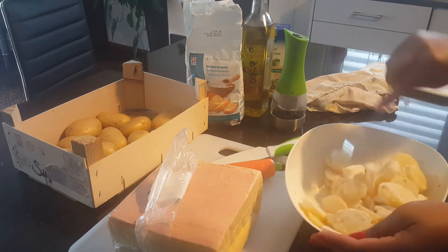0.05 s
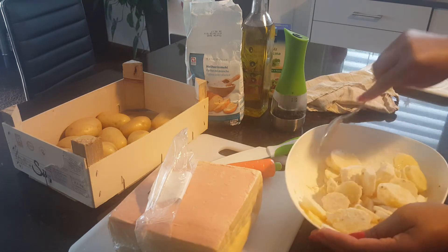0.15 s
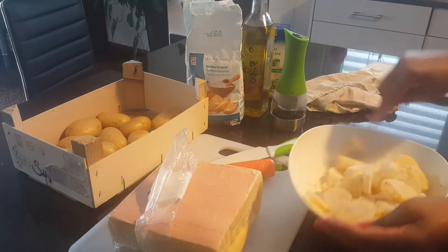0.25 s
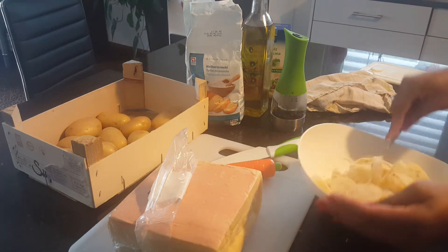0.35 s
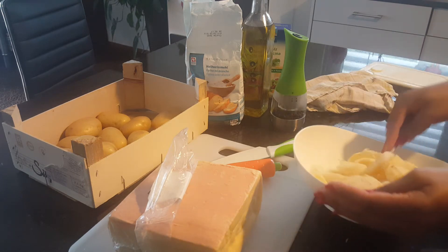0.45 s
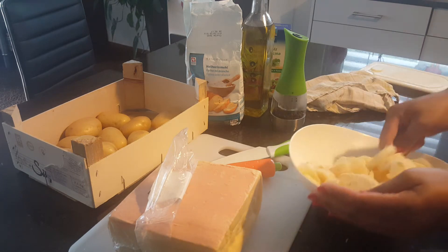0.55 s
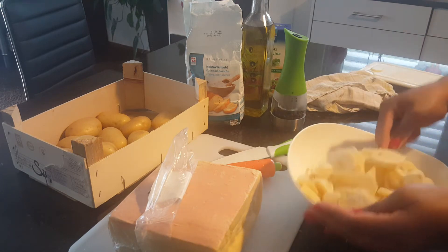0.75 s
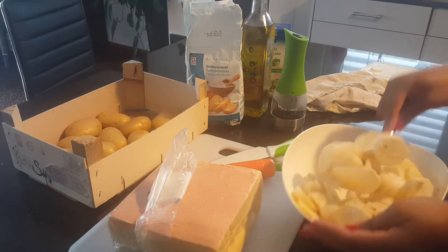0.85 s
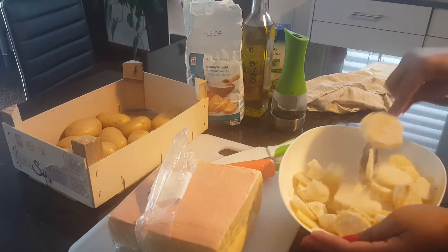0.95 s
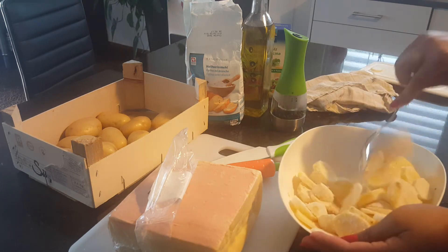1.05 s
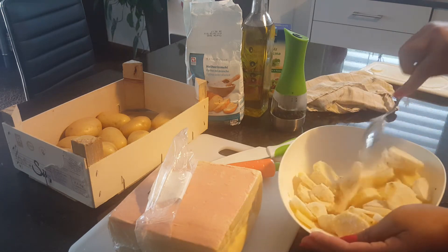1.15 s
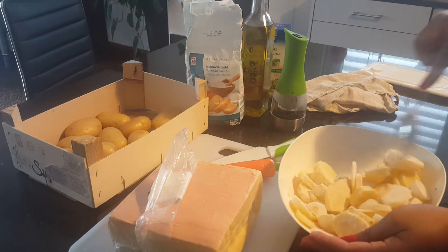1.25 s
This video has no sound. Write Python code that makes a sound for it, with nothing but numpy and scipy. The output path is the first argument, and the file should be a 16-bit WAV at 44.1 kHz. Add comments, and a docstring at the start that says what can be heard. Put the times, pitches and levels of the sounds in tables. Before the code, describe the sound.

A spoon knocks a hand-held bowl of raw potato slices in a small kitchen. Faint wet sliding comes first, then a short, dull clack at 0.23 s with slight ring and room echo. Slices pat and scrape, with a wet fizz and light spoon ticks near 0.35 and 0.6 s. Soft thuds at 0.7 s precede a weaker, duller knock and pats at 1 s. Quiet air and wavering low hum continue.

```python
"""A small kitchen, a hand-held bowl of raw potato slices, heard by two microphones set close together. Room air
and a wavering low hum run throughout; first wet slices slide faintly under a metal spoon. At 0.23 s the spoon
knocks the bowl, dull and short, followed by a dull rebound, scrapes, fizz and ticks. Soft thuds follow near 0.7
s; at 1 s comes a weaker, duller knock with more thuds and pats. Knocks are filtered pulses and ringing modes,
slides are grain trains; table and walls send echoes back."""
import sys
import numpy as np
from scipy import signal
from scipy.fft import rfft, irfft
from scipy.io import wavfile
from scipy.ndimage import uniform_filter1d

SR = 44100
rng = np.random.default_rng(int(sys.argv[2]) if len(sys.argv) > 2 else 0)


def transcribe(signal):
    """Save signal, clipped to [-1, 1], as a 16-bit WAV file at the path in sys.argv[1]."""
    frames = np.atleast_2d(signal).T
    limited = np.clip(frames, -1, 1)
    pcm = np.round(limited * 32767).astype(np.int16)
    wavfile.write(sys.argv[1], SR, pcm)


N = 57330


def amp(db):
    """Decibels to amplitude gain."""
    return 10 ** (np.asarray(db) / 20)


def unit(x):
    """Scales to rms 1."""
    return x / np.sqrt(np.mean(x ** 2) + 1e-20)


def read(points, hz):
    """Reads a table of values against frequency on a log-frequency axis."""
    f, value = np.transpose(points)
    return np.interp(np.log(hz + 1), np.log(f + 1), value)


def add(mix, start_s, sound):
    """Mixes a sound in at a start time, cut at the end of the mix."""
    part = mix[max(round(start_s * SR), 0):][:len(sound)]
    part += sound[:len(part)]


def lean(db):
    """Left and right gains: positive dB leans left, negative leans right."""
    return amp([[db], [-db]])


def tint(x, points):
    """Filters a signal by a table of frequency and gain."""
    hz = np.fft.rfftfreq(x.shape[-1], 1 / SR)
    return irfft(rfft(x) * amp(read(points, hz)), x.shape[-1])


# How alike the two microphones hear diffuse sound.
# Each row: frequency in Hz, left-right likeness from 0 to 1.
MICROPHONE_LIKENESS = [(50, .96), (250, .9), (600, 0.43), (1500, 0), (4000, 0.06), (16000, 0)]


def pair(x):
    """Makes two unrelated channels alike in the bass, as at two close microphones."""
    a, b = rfft(x)
    likeness = read(MICROPHONE_LIKENESS, np.fft.rfftfreq(x.shape[-1], 1 / SR))
    turn = np.arccos(np.clip(likeness, -1, 1)) / 2
    shared, apart = a * np.cos(turn), b * np.sin(turn)
    return irfft(np.array([shared + apart, shared - apart]), x.shape[-1])


TREBLE_HZ = 3400  # half of a blow's treble change, in dB, is reached here


def blow(colour, treble_db=0, size=4096):
    """The shortest causal (minimum-phase) pulse with a given spectrum and treble shelf."""
    hz = abs(np.fft.fftfreq(size, 1 / SR))
    db = read(colour, hz) + treble_db * hz ** 2 / (hz ** 2 + TREBLE_HZ ** 2)
    # the Hilbert transform of the log gain gives the minimum phase
    spectrum = np.exp(signal.hilbert(np.log(amp(db))).conj())
    return np.fft.ifft(spectrum).real[:size // 2]


def mode(hz, t60):
    """One dying vibration that starts without a net push of air."""
    t = np.arange(N) / SR
    decay = np.exp(-np.log(1000) * t / t60)
    swing = np.sin(2 * np.pi * hz * t) * decay * (1 - np.exp(-2 * hz * t))
    return np.gradient(swing) * SR / (2 * np.pi * hz)


# Reverberation of the small kitchen. Each row: frequency in Hz, time to fall 60 dB in seconds.
ROOM_DECAY = [(100, .55), (400, 0.64), (1000, 0.55), (3000, 0.52), (8000, 0.24), (16000, 0.31)]
ROOM_BUILD_S = 0.0044


def kitchen(x):
    """The diffuse tail of the room: noise that builds up, each band dying at its own speed."""
    hz, t, z = signal.stft(pair(rng.standard_normal((2, SR))), SR, nperseg=256)
    fall = amp(-60 * t / read(ROOM_DECAY, hz)[:, None])
    tail = signal.istft(z * fall, SR, nperseg=256)[1]
    tail_s = np.arange(tail.shape[1]) / SR
    tail = tail * (1 - np.exp(-(tail_s / ROOM_BUILD_S) ** 2))
    tail = tail / np.linalg.norm(tail[0])
    return signal.fftconvolve(np.atleast_2d(x), tail, axes=1)[:, :N]


# Early echoes off the table and things on it.
# Each row: delay to the left in seconds, delay to the right in seconds, amplitude gain.
EARLY_ECHOES = [(.0068, 0.0073, 0.36), (0.0161, .0154, 0.18)]


def echoes(x):
    """First reflections, reaching left and right at slightly different times."""
    out = np.zeros((2, N))
    for left_s, right_s, gain in EARLY_ECHOES:
        add(out[0], left_s, gain * x)
        add(out[1], right_s, gain * x)
    return out


# Spectrum of the kitchen air. Each row: frequency in Hz, relative level in dB per Hz.
AIR_COLOUR = [(20, -14), (45, -16), (70, -14), (100, -4), (135, -2), (190, -8), (280, -8), (340, -11),
              (640, -12), (730, -17), (950, -17), (1400, -26.5), (1900, -27), (3200, -36), (5400, -47),
              (9000, -51), (16000, -46.5)]
AIR_DB, AIR_PATCH_DB = -46.5, 0.5  # overall level; rms unevenness over time and frequency
# Rise and fall of the hum. Each row: time in seconds, level in dB.
HUM_LEVEL = [(0, -61), (.25, -58), (.38, -45.5), (.48, -51), (.58, -43.5), (0.661, -79), (1.0, -53.5),
             (1.15, -48.5), (1.3, -47.5)]
HUM_HZ, HUM_WAVER_HZ = 130.7, 8.54  # mean pitch, rms pitch waver
HUM_WAVER_S = 0.03396  # averaging time of the waver


def background():
    """Faintly uneven room noise and a low hum whose pitch wavers at random."""
    z = signal.stft(pair(rng.standard_normal((2, N))), nperseg=1024, noverlap=768)[2]
    patches = uniform_filter1d(rng.standard_normal(z.shape[1:]), size=8, axis=0)
    patches = unit(uniform_filter1d(patches, size=14, axis=1))
    air = signal.istft(z * amp(AIR_PATCH_DB * patches), nperseg=1024, noverlap=768)[1][:, :N]
    waver = unit(uniform_filter1d(rng.standard_normal(N), round(HUM_WAVER_S * SR)))
    hum = unit(np.sin(2 * np.pi * np.cumsum(HUM_HZ + HUM_WAVER_HZ * waver) / SR))
    hum_db = np.interp(np.arange(N) / SR, *np.transpose(HUM_LEVEL))
    return amp(AIR_DB) * unit(tint(air, AIR_COLOUR)) + hum * amp(hum_db)


# Soft thuds of slices and bowl.
# Each row: start in seconds, pitch in Hz, level in dB, time to fall 60 dB in seconds.
LOAD_THUDS = [(0.685, 154, -34, 0.042), (0.716, 155, -31.5, 0.055), (1.004, 189, -27, 0.059),
              (1.009, 397.4, -39.5, 0.1), (1.012, 69.6, -39, 0.35), (1.036, 274, -37, 0.09),
              (1.136, 150, -36, 0.076)]
THUD_RISE_S = 0.002


def thuds():
    """Low, soft bumps as the load shifts in the bowl: single modes with a softened start."""
    out = np.zeros(N)
    rise = 1 - np.exp(-np.arange(N) / SR / THUD_RISE_S)
    for start_s, hz, db, t60 in LOAD_THUDS:
        add(out, start_s, amp(db) * rise * mode(hz, t60))
    return out


GRAIN_SPREAD_DB = 3  # mean of the random grain level, before its cap at four times this


def grains(colour, per_s):
    """A dense random train of tiny slips of uneven size and either sign, coloured, at rms 1."""
    size = amp(GRAIN_SPREAD_DB * np.minimum(rng.exponential(1, (2, N)), 4))
    sign = rng.choice([-1, 1], (2, N))
    happens = rng.random((2, N)) < per_s / SR
    return unit(tint(pair(size * sign * happens), colour))


# Slices sliding under the spoon. Each row: peak time in seconds, rise in seconds, fall in seconds,
# scrape level in dB, wet fizz level in dB.
SLICE_SLIDES = [(.005, 0.027, 0.039, -54, -66), (0.239, .003, 0.03, -36.5, -61),
                (0.341, 0.036, 0.023, -47, -47.5), (.44, 0.029, 0.11, -53, -66),
                (0.56, 0.032, 0.036, -49, -55.5), (0.603, 0.012, 0.053, -53, -60.5),
                (.82, 0.041, 0.033, -64.5, -73.5), (1.014, 0.013, 0.043, -49.5, -72)]
# Spectrum of the spoon's scrape. Each row: frequency in Hz, relative level in dB per Hz.
SCRAPE_COLOUR = [(100, -8.5), (400, -11.5), (900, -1.5), (1700, -7), (2300, -11.5), (2850, -11.5),
                 (3600, -25.5), (5000, -28), (8000, -31.5), (16000, -34)]
# Spectrum of the wet fizz. Each row: frequency in Hz, relative level in dB per Hz.
FIZZ_COLOUR = [(500, -30), (2500, 4), (4500, 1.5), (7000, -5), (10000, -8.5), (13500, -9), (16000, -36)]
SCRAPE_PER_S, FIZZ_PER_S = 8200, 2800  # mean grains per second
FIZZ_LEAN_DB, SLIDE_ROOM_DB = -1, -2


def slides():
    """Each push swells and fades: the spoon scrapes and wet slices peel apart."""
    t = np.arange(N) / SR
    scrape_level, fizz_level = np.zeros((2, N))
    for peak_s, rise_s, fall_s, scrape_db, fizz_db in SLICE_SLIDES:
        swell = np.exp(-np.maximum((peak_s - t) / rise_s, (t - peak_s) / fall_s))
        scrape_level += amp(scrape_db) * swell
        fizz_level += amp(fizz_db) * swell
    scrape = scrape_level * grains(SCRAPE_COLOUR, SCRAPE_PER_S)
    fizz = fizz_level * grains(FIZZ_COLOUR, FIZZ_PER_S) * lean(FIZZ_LEAN_DB)
    out = scrape + fizz
    return out + amp(SLIDE_ROOM_DB) * kitchen(out)


# Dull pats: a rebound just after the first knock, then slices dropping back near the second. Each row: start in
# seconds, level in dB.
DULL_PATS = [(0.2861, -7), (1.007, -7), (1.022, -21), (1.041, -15.5), (1.055, -16.5), (1.244, -29)]
# Spectrum of a pat. Each row: frequency in Hz, gain in dB.
PAT_SPECTRUM = [(60, -11), (250, 3), (500, 6.5), (1200, 5), (1900, 1.5), (2400, -13.5), (4000, -32.5),
                (16000, -44)]
PAT_ROOM_DB = 1.5


def pats():
    """Small dull pats, each a short filtered pulse: a rebound of the first knock, then slices landing on one
    another."""
    out = np.zeros(N)
    pat = blow(PAT_SPECTRUM)
    for start_s, db in DULL_PATS:
        add(out, start_s, amp(db) * pat)
    return out + echoes(out) + amp(PAT_ROOM_DB) * kitchen(out)


# Light ticks of the spoon. Each row: start in seconds, level in dB.
SPOON_TICKS = [(0.3516, -4), (0.5953, -11)]
# The catching edge stutters. Each row: delay after first touch in seconds, level in dB.
EDGE_STUTTER = [(0, -0.5), (.0015, -6), (.0033, -9), (.0058, -12)]
# Spectrum of one touch. Each row: frequency in Hz, gain in dB.
TICK_SPECTRUM = [(200, -26), (900, -12), (1750, -2), (2800, 4.5), (3500, -13), (4600, -20.5), (6000, -36),
                 (16000, -52)]
# Ring of the hand-held spoon. Each row: frequency in Hz, level in dB, time to fall 60 dB in seconds.
SPOON_MODES = [(1770, -9, 0.064), (2275, -0.5, 0.038), (2833, 0.5, 0.032), (3430, -7, 0.026),
               (4700, -13, .04)]
SPOON_DB, TICK_ROOM_DB = -31, -11.5


def ticks():
    """The spoon's edge catches, stutters and clinks: repeated pulses over a brief metal ring."""
    out = np.zeros(N)
    spoon = sum(amp(SPOON_DB + db) * mode(hz, t60) for hz, db, t60 in SPOON_MODES)
    touch = blow(TICK_SPECTRUM)
    for start_s, db in SPOON_TICKS:
        add(out, start_s, amp(db) * spoon)
        for delay_s, touch_db in EDGE_STUTTER:
            add(out, start_s + delay_s, amp(db + touch_db) * touch)
    return out + echoes(out) + amp(TICK_ROOM_DB) * kitchen(out)


# Spoon against bowl. Each row: start in seconds, level in dB, treble change in dB, ring level in dB.
BOWL_KNOCKS = [(0.2335, 19, -2.5, -1), (1, 6, -10.5, -8.5)]
# The spoon chatters as it lands. Each row: delay after first touch in seconds, level in dB.
LANDING_CHATTER = [(0, -10), (.0006, 1), (.0022, -10)]
# Damped body of a knock. Each row: frequency in Hz, gain in dB.
KNOCK_SPECTRUM = [(40, -49), (110, -27), (210, -15), (350, 1.5), (560, -4), (720, 3), (1050, 5),
                  (1280, -1.5), (1450, -11), (1850, -1), (2100, -4), (2300, -16.5), (2700, -7.5),
                  (3100, -22.5), (4200, -25), (6500, -40), (10000, -45), (16000, -67)]
# Bowl modes. Each row: frequency in Hz, level in dB, time to fall 60 dB in seconds.
BOWL_MODES = [(370.5, -6.5, 0.25), (778.3, -1, 0.2), (776, -11.5, 0.78), (1038, -11.5, 0.28),
              (1300, -11, 0.24), (1696, -13, 0.13), (1986, -20, 0.23)]
# What walls and table give back. Each row: frequency in Hz, gain in dB.
BOUNCE_SPECTRUM = [(100, -5), (400, -2), (800, 1), (1300, -4), (1900, -3), (3000, -1.5), (6000, 1.5),
                   (16000, -3)]
RING_DB, KNOCK_ROOM_DB = -42, -5.5


def knocks():
    """The spoon chatters against the loaded bowl: a damped clack and a faint ring."""
    clack, ring = np.zeros((2, N))
    bowl = sum(amp(db) * mode(hz, t60) for hz, db, t60 in BOWL_MODES)
    for start_s, db, treble_db, ring_db in BOWL_KNOCKS:
        pulse = blow(KNOCK_SPECTRUM, treble_db)
        for delay_s, touch_db in LANDING_CHATTER:
            add(clack, start_s + delay_s, -amp(db + touch_db) * pulse)  # inverted pulse
        add(ring, start_s, amp(db + ring_db + RING_DB) * bowl)
    bounce = signal.fftconvolve(clack, blow(BOUNCE_SPECTRUM))[:N]
    return clack + ring + echoes(bounce) + amp(KNOCK_ROOM_DB) * kitchen(bounce)


LEAN_DB = 0.35  # whole scene a little to the left


def scene():
    """Kitchen air and hum, then slices, spoon and bowl in front of the microphones."""
    bowl_and_slices = thuds() + slides() + pats() + ticks() + knocks()
    return (background() + bowl_and_slices) * lean(LEAN_DB)


EDGE_HZ = 15900


def record(dry):
    """The recorder's band limit: a steep low-pass filter."""
    lowpass = signal.firwin(511, EDGE_HZ, window=("kaiser", 9), fs=SR)
    return signal.oaconvolve(dry, lowpass[None], "same")


dry = scene()
out = record(dry)
transcribe(out)
```